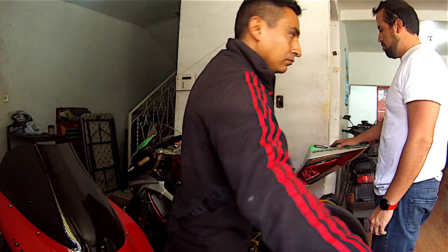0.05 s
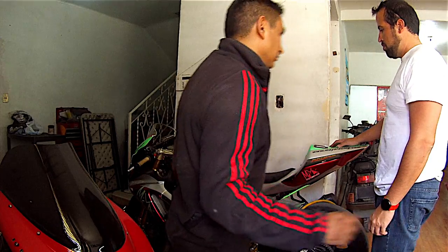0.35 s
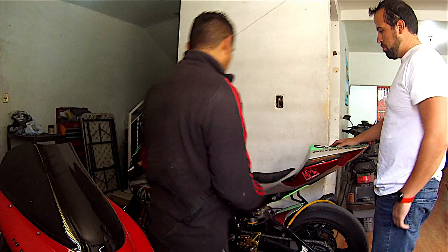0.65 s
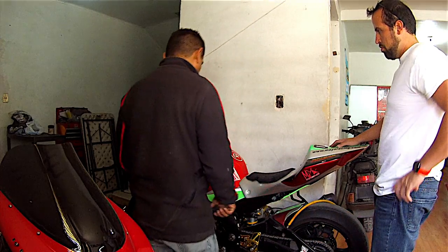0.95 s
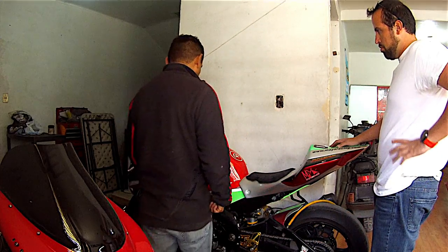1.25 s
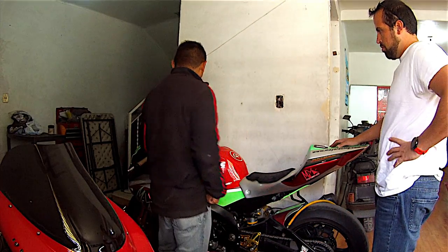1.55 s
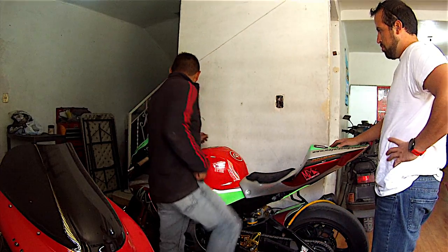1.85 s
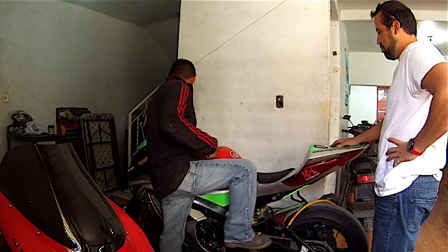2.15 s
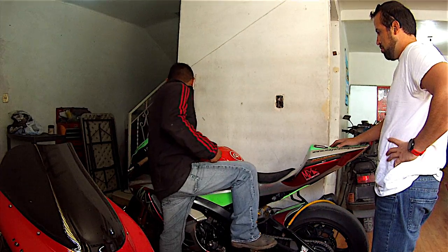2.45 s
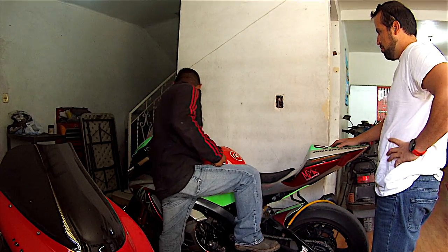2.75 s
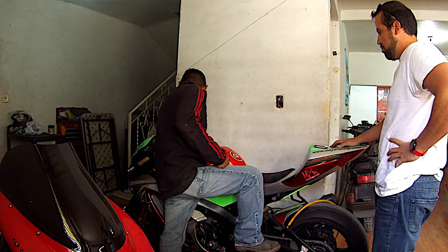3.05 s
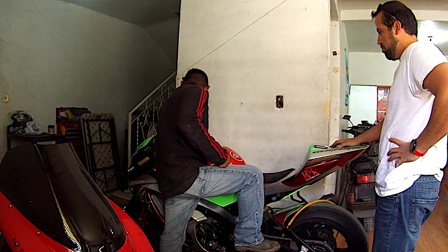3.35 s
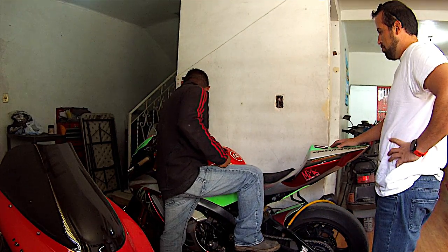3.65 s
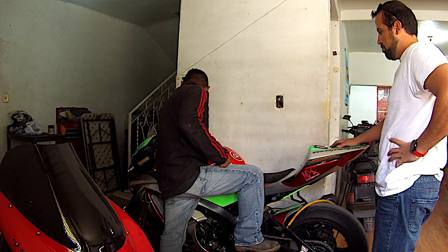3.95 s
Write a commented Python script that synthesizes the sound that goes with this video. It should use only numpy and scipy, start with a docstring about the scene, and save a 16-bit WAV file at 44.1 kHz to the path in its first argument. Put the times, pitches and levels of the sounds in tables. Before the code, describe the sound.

A motorcycle idles unevenly in a small workshop, then revs once briefly.

```python
"""A small workshop: a motorcycle idles unevenly, and near the end the throttle is blipped once.
Each firing thumps into the resonances of the exhaust and the room, and now and then one thuds harder.
Valves and gears clatter in the engine case, with a thin whine and faint squeaks on top.
The intake honks as the throttle opens; a deep drone and a faint room rumble lie under it all."""
import sys
import numpy as np
from scipy import signal
from scipy.fft import rfft, irfft
from scipy.io import wavfile
from scipy.ndimage import uniform_filter1d

SR = 44100
rng = np.random.default_rng(int(sys.argv[2]) if len(sys.argv) > 2 else 0)


def wrap_up_sound(samples):
    """Save the sound to the file named by the first command line argument, as 16-bit audio."""
    columns = np.atleast_2d(samples).T
    # keep every value between -1 and 1, then stretch to whole-number steps
    tamed = np.clip(columns, -1, 1)
    steps = np.round(tamed * 32767).astype(np.int16)
    wavfile.write(sys.argv[1], SR, steps)


N = 176400

# Engine speed, from idle into the blip. Each row: time in seconds, firings per second.
FIRING_RATE = [(0, 35.8), (.2, 37), (.45, 37.6), (.75, 37), (1.0, 37.5), (1.45, 37), (1.75, 36.6),
               (2.0, 37.3), (2.4, 37), (2.75, 35.8), (3.24, 36.8), (3.38, 50), (3.46, 61), (3.53, 71),
               (3.61, 83), (3.66, 78), (3.73, 65), (4.0, 46)]
# The lope of the four cylinders. Each entry, in firing order: accent in dB.
CYLINDER_ACCENTS = [0.2, 0.9, -0.1, -2.8]
# How hard the firings hit. Each row: time in seconds, gain in dB.
FIRING_EFFORT = [(0, -1.5), (.3, 1), (.7, -0.5), (.85, -1), (1.15, -1), (1.65, 0.5), (2.1, -1.5),
                 (2.72, -0.5), (2.81, -6.5), (2.9, 2), (3.08, -2), (3.25, -4), (3.33, 6.5), (3.39, -3),
                 (3.45, 8), (3.53, 6), (3.575, 12), (3.615, 13), (3.645, 2), (3.72, 3), (3.8, 4),
                 (3.87, -2.5), (4.0, -2.5)]
# Boom of exhaust and room. Each row: pitch in Hz, width in Hz, idle level in dB before the effort gain,
# extra at top speed in dB, turbulent share at idle from 0 to 1.
BOOM_MODES = [(52.1, 6.2, -33, -0.5, 0.67), (85.5, 6.3, -33.5, 2, 0.29), (118, 21.5, -32, -1, 0.94),
              (174.9, 18, -34.5, -10, 0.43), (206.7, 21.5, -30.5, 4.5, 0.29), (227.5, 13.5, -33, 5.5, 0.05),
              (275.6, 7.3, -35, -1.5, 0.26), (306.7, 14.8, -36.5, 7.5, 0.51),
              (329.3, 19.2, -41.5, 19, 0.36), (375, 12, -44.5, 14, 0.2), (406, 27, -49, 14.5, 0.73),
              (488, 18.4, -53, 5.5, 0.83)]
# Rasp of gas leaving the pipe. Each row: frequency in Hz, relative level in dB.
RASP_EQ = [(250, -75), (420, -5), (580, 4.5), (780, 0.5), (1020, -6.5), (1400, 4.5), (3000, -43.5)]
# Pitches cancelled by wall reflections. Each row: frequency in Hz, width in Hz.
WALL_NOTCHES = [(66, 2.9), (167, 1.9), (250, 9.5), (290, 4.1), (358, 22)]
# Fader for the hum of the strongest resonance. Each row: time in seconds, level in dB.
HUM_FADER = [(0, -20.5), (.12, -27), (.24, -41), (.36, -26), (.52, -26), (.62, -32), (.77, -26.5),
             (.87, -33), (1.0, -25), (1.22, -36), (1.4, -27), (1.56, -22.5), (1.67, -32.5), (1.78, -27),
             (1.98, -25), (2.1, -30.5), (2.3, -25.5), (2.42, -24.5), (2.52, -32.5), (2.74, -23.5),
             (2.81, -34), (2.9, -28), (3.1, -30), (3.2, -23.5), (3.36, -22.5), (3.48, -18), (3.54, -9),
             (3.61, -39), (3.68, -16.5), (3.78, -29), (4.0, -30.5)]
# Single hard firings. Each row: start in seconds, peak level in dB.
THUDS = [(.357, -21), (1.534, -29), (1.86, -16.5), (2.401, -31), (2.725, -14), (2.892, -16), (3.172, -15.5),
         (3.439, -36), (3.535, -10), (3.654, -10.5), (3.719, -17)]
# Ring of the engine case. Each row: pitch in Hz, width in Hz, level in dB before the fader.
CASE_MODES = [(1413, 79, -45.5), (1522, 28, -47), (1568, 53, -48.5), (1707, 120, -56.5), (2020, 51, -52),
              (2252, 145, -49.5), (2640, 130, -64.5), (2905, 110, -54), (3255, 55, -66), (3720, 74, -62),
              (5440, 250, -69.5), (6480, 140, -73)]
# Fader for the ringing case. Each row: time in seconds, gain in dB.
CASE_FADER = [(0, 0.5), (.4, 0.5), (1.9, 1), (2.65, 1), (2.85, 0.5), (3.08, -0.5), (3.3, 2.5), (3.58, 3.5),
              (3.8, -5.5), (4.0, -6.5)]
# Broad rustle of chain and valve gear. Each row: frequency in Hz, relative level in dB.
RUSTLE_EQ = [(700, 7), (1300, 0), (2400, 4.5), (3300, -4.5), (4600, -5.5), (6000, -9), (8000, -15),
             (11000, -19.5), (15000, -26)]
# Fader for the rustle. Each row: time in seconds, gain in dB.
RUSTLE_FADER = [(0, 1), (1.9, 0.6), (3.22, 0.5), (3.31, 4), (3.39, 2), (3.45, 4.5), (3.61, 8), (3.68, 2.5),
                (3.78, -1), (4.0, -2)]
# Brief rattles of the valve gear. Each row: centre in seconds, relative level in dB.
VALVE_RATTLES = [(.161, -7), (.285, -8), (.907, -19), (1.014, -5), (1.214, -1), (1.445, -1), (1.661, -5),
                 (1.753, -6), (1.86, -2), (2.004, -5), (2.294, 3), (2.404, 0), (2.506, 0), (2.726, 1),
                 (2.877, 4), (2.948, 3), (3.187, -2), (3.826, 3)]
# Honk of the intake. Each row: frequency in Hz, relative level in dB.
INTAKE_EQ = [(600, -5), (1100, -9), (1500, -8), (1820, -16), (2030, 10.5), (2170, 10), (2350, 1.5),
             (2700, -8), (3200, -14), (4500, -16.5), (6500, -17), (9000, -38), (15000, -60)]
# Opening of the throttle. Each row: time in seconds, linear gain on the intake.
THROTTLE_GAIN = [(3.22, 0.14), (3.31, 0.57), (3.41, 0.25), (3.44, 1.1), (3.49, 0.6), (3.57, 0.53),
                 (3.67, 0.22), (3.76, 0.29)]
# Fader for the gear whine. Each row: time in seconds, level in dB.
WHINE_FADER = [(0, -54), (1.2, -53), (2.6, -62), (2.8, -39), (3.05, -47.5), (3.25, -43.5), (3.55, -40),
               (4.0, -66)]
# Faint metallic squeaks. Each row: centre in seconds, level of the upper note in dB.
SQUEAK_CUES = [(.214, -74), (.383, -74), (.584, -76), (.776, -73), (.86, -75), (.95, -73), (1.215, -75),
               (1.372, -76), (1.49, -73), (1.632, -71), (1.87, -72), (2.034, -72), (2.209, -78),
               (3.485, -72)]
# Fader for the deep drone. Each row: time in seconds, level in dB.
DRONE_FADER = [(0, -35), (.3, -29.5), (.5, -27.5), (.9, -32.5), (1.3, -29), (1.55, -33.5), (1.78, -25),
               (2.05, -42), (2.3, -36), (2.55, -38), (2.9, -30.5), (3.05, -27.5), (3.3, -26), (3.6, -26),
               (4.0, -38)]
# Rumble of the room. Each row: frequency in Hz, relative level in dB.
RUMBLE_EQ = [(10, 0), (25, -7), (45, -1), (90, -7), (300, -45), (1000, -82)]

PUFF_S = 0.0076   # dry decay time of the burst after each firing
RATTLE_TICKS_PER_S = 410


def firings(speed, wander=0.012, jitter_s=0.0005, spread_db=0.5):
    """One click per firing, uneven in time and strength at idle, steadier when revved."""
    count = np.cumsum(speed * (1 + wander * drift(3))) / SR
    at = np.flatnonzero(np.diff(np.floor(count), prepend=-1))
    timing, strength = rng.standard_normal((len(at), 2)).T
    uneven = unevenness(speed)[at]
    at = np.clip(at + (jitter_s * SR * uneven * timing).astype(int), 0, N - 1)
    clicks = np.zeros(N)
    clicks[at] = from_db(uneven * (np.resize(CYLINDER_ACCENTS, len(at)) + spread_db * strength))
    return clicks


def exhaust(clicks, speed):
    """Boom, a dry thump straight from the tailpipe and a rasp of gas, notched by wall reflections."""
    effort_db = curve(FIRING_EFFORT)
    puffs = decays(clicks, PUFF_S)
    body = boom(clicks, puffs, speed, effort_db)
    thump = from_db(-34 + 0.96 * effort_db) * rms_one(bandpass(clicks, 171, 337, order=3))
    rasp = from_db(-46 + 0.19 * effort_db) * colour(puffs * noise(), RASP_EQ)
    pipe = body + thump + rasp
    for hz, width in WALL_NOTCHES:
        pipe = signal.lfilter(*signal.iirnotch(hz, hz / width, fs=SR), pipe)
    return pipe


def boom(clicks, puffs, speed, effort_db, tone_spread=0.66):
    """Kicks and turbulent puffs ring the exhaust and room; the upper resonances swell with speed."""
    revved, uneven = revving(speed), unevenness(speed)
    rings, power = 0, 0
    for hz, width, db, revved_db, idle_turbulence in BOOM_MODES:
        turbulence = idle_turbulence * uneven
        kicks = rms_one(clicks * (1 + tone_spread * uneven * noise()))
        drive = np.sqrt(1 - turbulence) * kicks + np.sqrt(turbulence) * puffs * noise()
        gain = from_db(db + effort_db + revved_db * revved)
        rings += gain * resonate(drive, hz, width, skirt_widths=3.9)
        power += gain ** 2
    level = np.sqrt(power)
    return bandpass(level * level_out(rings / level), 47.6, 520)


def hum(clicks):
    """The strongest resonance sings on whichever multiple of the firing rate lies nearest."""
    ring = resonate(clicks, hz=143.74, width_hz=7.6, skirt_widths=2.5)
    return from_db(curve(HUM_FADER)) * level_out(ring)


def growl(speed, from_hz=35, full_hz=62):
    """The pipe radiates the firing rate as a low tone that comes forward in the blip."""
    opening = np.clip((speed - from_hz) / (full_hz - from_hz), 0, 1)
    return from_db(-24) * opening * tone(speed)


def hard_firings():
    """Now and then a charge burns harder and thuds out of the pipe."""
    start_s, peak_db = np.transpose(THUDS)
    clicks = np.zeros(N)
    clicks[(start_s * SR).astype(int)] = from_db(peak_db)
    thuds = bandpass(clicks, 85.6, 289, order=4)
    return thuds * clicks.max() / np.abs(thuds).max()


def clatter(clicks, tick_share=0.31):
    """Valve gear ticks and rubs, bunched at each firing, and rings the engine case over the rustle."""
    pulse = (1 + decays(clicks, PUFF_S)) * from_db(-0.5 * drift(8.2))
    drive = pulse * (np.sqrt(tick_share) * ticks(per_s=700) + np.sqrt(1 - tick_share) * noise())
    case = sum((-1) ** k * from_db(db) * resonate(drive, hz, width)   # neighbours alternate in polarity
               for k, (hz, width, db) in enumerate(CASE_MODES))
    return from_db(curve(CASE_FADER)) * case + rustle(pulse)


def rustle(pulse):
    """Chain and valve gear hiss and pulse gently, with light tappet ticks and brief rattles."""
    rattles = from_db(-2.5) * swells(VALVE_RATTLES, 0.016) * ticks(RATTLE_TICKS_PER_S)
    flutter = pulse ** 0.4 * from_db(0.7 * drift(25))
    tappets = from_db(-9.5) * ticks(per_s=150)
    texture = flutter * (noise() + tappets + rattles)
    return from_db(-46.5 + curve(RUSTLE_FADER)) * colour(texture, RUSTLE_EQ)


def intake(clicks):
    """Air is gulped past the throttle at each firing and honks louder as it opens."""
    gulps = decays(clicks, PUFF_S) * noise()
    return from_db(-36.5) * curve(THROTTLE_GAIN) * colour(gulps, INTAKE_EQ)


def gear_whine():
    """The gears ring in one thin, narrow band."""
    return from_db(curve(WHINE_FADER)) * resonate(noise(), hz=1588, width_hz=16)


def squeaks(hz=11250):
    """Tiny metallic contacts ring a very high note and a louder one an octave below."""
    upper = resonate(ticks(RATTLE_TICKS_PER_S), hz, width_hz=100)
    lower = resonate(ticks(RATTLE_TICKS_PER_S), hz / 2, width_hz=100)
    return swells(SQUEAK_CUES, 0.045) * (upper + from_db(4.5) * lower)


def drone(hz=35.4, wander=0.017):
    """A deep, nearly pure tone that swells and sinks."""
    return from_db(curve(DRONE_FADER)) * tone(hz * (1 + wander * drift(1.8)))


def room_rumble():
    """A faint bed of low noise fills the room."""
    return from_db(-50) * colour(noise(), RUMBLE_EQ)


def revving(speed):
    """How far the engine is revved: 0 at idle, 1 at top speed."""
    idle = np.median(speed)
    return np.clip((speed - idle) / (speed.max() - idle), 0, 1) ** 0.6


def unevenness(speed):
    """The engine's roughness: 1 at idle, a third less at top speed."""
    return 1 - 0.33 * revving(speed)


def decays(clicks, seconds, room_decay_s=0.032, room_share=0.71):
    """A dying envelope after every click, drawn out by the room's reverberation; rms 1."""
    direct_power = signal.lfilter([1], [1, -np.exp(-1 / (seconds * SR))], clicks + 1e-18) ** 2
    pole = np.exp(-1 / (room_decay_s * SR))
    tail_power, _ = signal.lfilter([1 - pole], [1, -pole], direct_power, zi=[direct_power.mean()])
    return rms_one(np.sqrt((1 - room_share) * direct_power + room_share * tail_power))


def swells(cues, half_width_s):
    """A short bell-shaped envelope around each cue."""
    t = np.arange(N) / SR
    power = sum(from_db(db) ** 2 * np.exp(-np.minimum(((t - centre) / half_width_s) ** 2, 20))
                for centre, db in cues)
    return np.sqrt(power)


def resonate(x, hz, width_hz, skirt_widths=4.5):
    """Ring one resonance, its skirts rolled off about skirt_widths widths away; rms 1."""
    r = np.exp(-np.pi * width_hz / SR)
    ring = signal.lfilter([1, 0, -1], [1, -2 * r * np.cos(2 * np.pi * hz / SR), r * r], x + 1e-18)
    reach = 1 + skirt_widths * width_hz / hz
    return rms_one(bandpass(ring, hz / reach, hz * reach))


def bandpass(x, low_hz, high_hz, order=2):
    """Roll off the lows and highs outside a band."""
    return signal.sosfilt(signal.butter(order, [low_hz, high_hz], "band", fs=SR, output="sos"), x + 1e-18)


def colour(x, eq):
    """Shape a sound with a smooth EQ curve, rolled off below its first point; rms 1."""
    hz, db = np.transpose(eq)
    bin_hz = np.maximum(np.arange(N // 2 + 1) * SR / N, 1)
    low_cut = np.minimum(bin_hz / hz[0], 1) ** 2
    gain = from_db(np.interp(np.log(bin_hz), np.log(hz), db))
    return rms_one(irfft(rfft(x) * low_cut * gain, N))


def level_out(x, window_s=0.07):
    """Ride the gain to take the slow surges out of a sound; rms near 1."""
    power = uniform_filter1d(x ** 2, int(window_s * SR), mode="reflect")
    return x / np.sqrt(np.maximum(power, 1e-12))


def drift(rate_hz, hop=40, settle=2000):
    """A slow random wobble; rms 1."""
    r = np.exp(-2 * np.pi * rate_hz * hop / SR)
    slow = signal.lfilter([1], [1, -2 * r, r * r], rng.standard_normal(N // hop + settle + 2))[settle:]
    return np.interp(np.arange(N) / hop, np.arange(len(slow)), rms_one(slow))


def ticks(per_s):
    """Metallic contacts of equal size at random moments; rms 1."""
    polarity = rng.choice([-1, 1], N)
    return rms_one(polarity * (rng.random(N) < per_s / SR))


def tone(hz):
    """A sine that follows a pitch curve; rms 1."""
    return np.sqrt(2) * np.sin(2 * np.pi * np.cumsum(hz) / SR)


def noise():
    """White noise; rms 1."""
    return rng.standard_normal(N)


def curve(rows):
    """An automation curve at every sample."""
    return np.interp(np.arange(N) / SR, *np.transpose(rows))


def from_db(db):
    """Decibels to gain."""
    return 10 ** (np.asarray(db) / 20)


def rms_one(x):
    """Scale to rms 1."""
    return x / np.sqrt(np.mean(x ** 2) + 1e-20)


def scene():
    """The mono mix: pipe, mechanics and intake ride one train of firings over the low bed."""
    speed = curve(FIRING_RATE)
    clicks = firings(speed)
    pipe = exhaust(clicks, speed) + hum(clicks) + growl(speed) + hard_firings()
    mechanics = clatter(clicks) + gear_whine() + squeaks()
    return (pipe + mechanics + intake(clicks) + drone() + room_rumble())[None]


def record(dry, cutoff_hz=15200):
    """Round off only the highest peaks, then cut the very top."""
    rounded = dry / (1 + dry ** 8) ** (1 / 8)
    return signal.sosfilt(signal.ellip(10, 0.1, 80, cutoff_hz, fs=SR, output="sos"), rounded)


dry = scene()
out = record(dry)
wrap_up_sound(out)
```